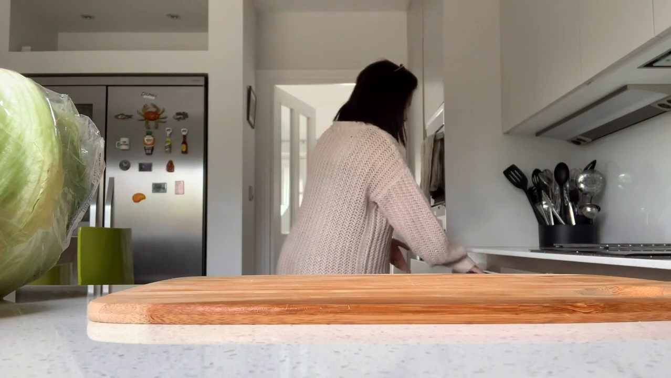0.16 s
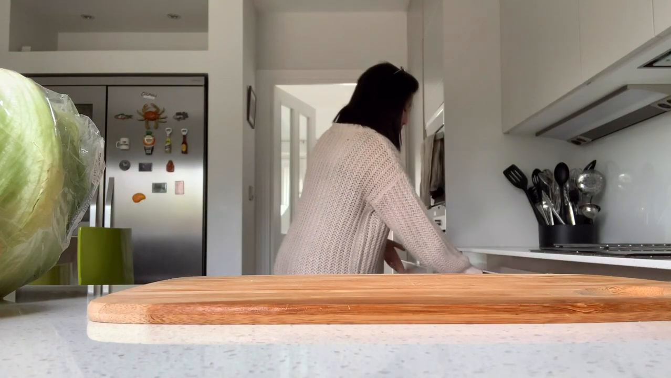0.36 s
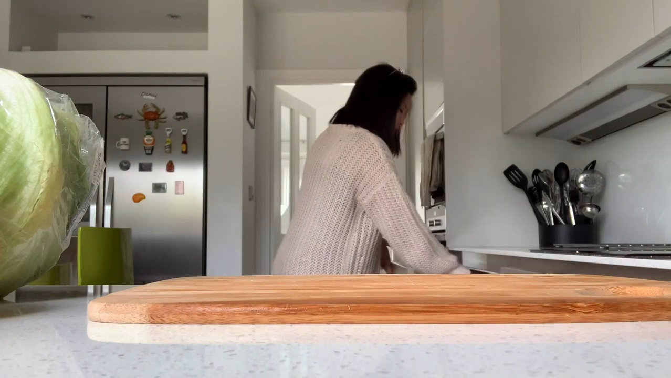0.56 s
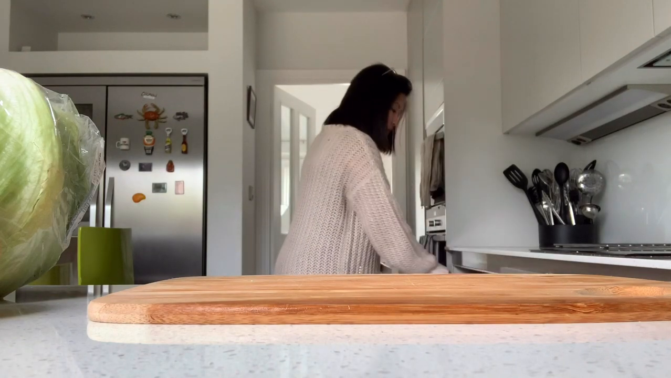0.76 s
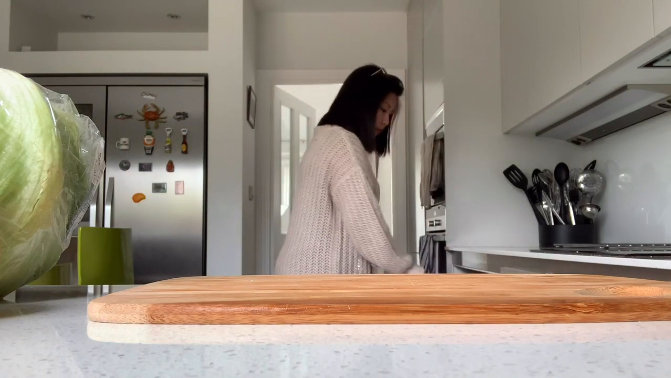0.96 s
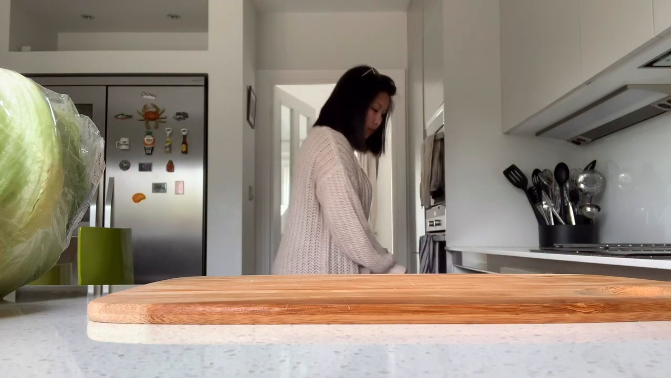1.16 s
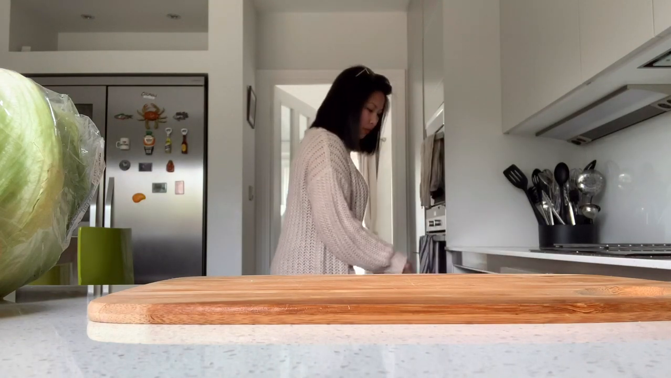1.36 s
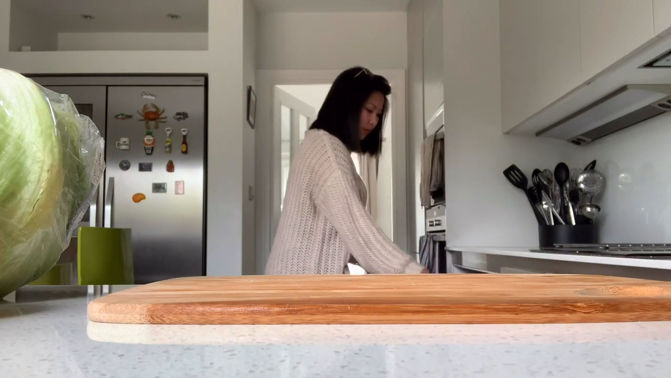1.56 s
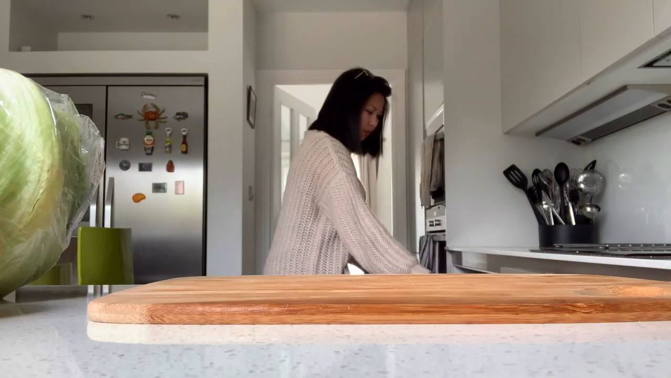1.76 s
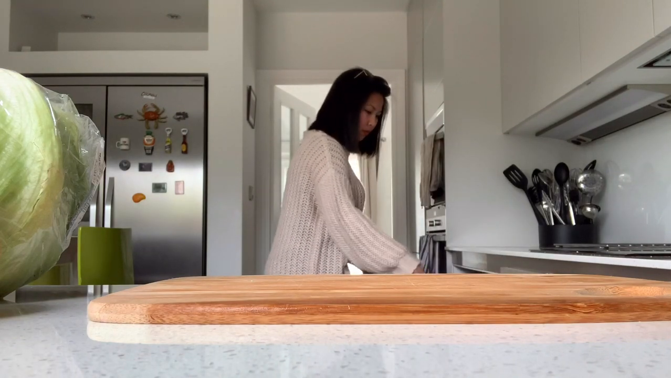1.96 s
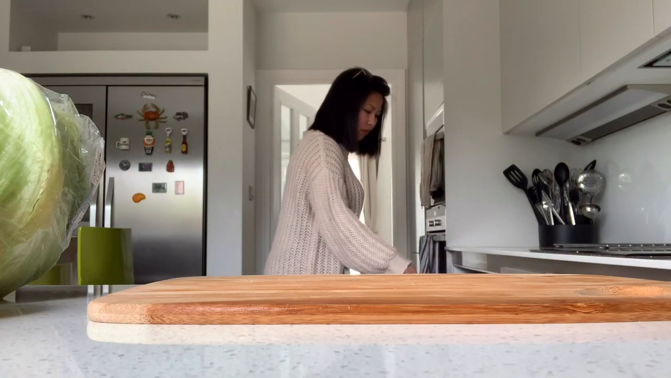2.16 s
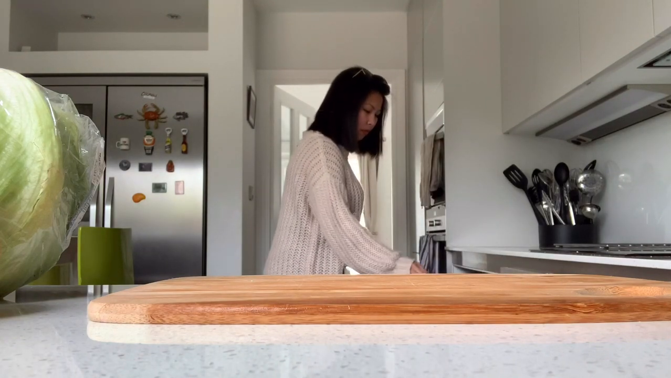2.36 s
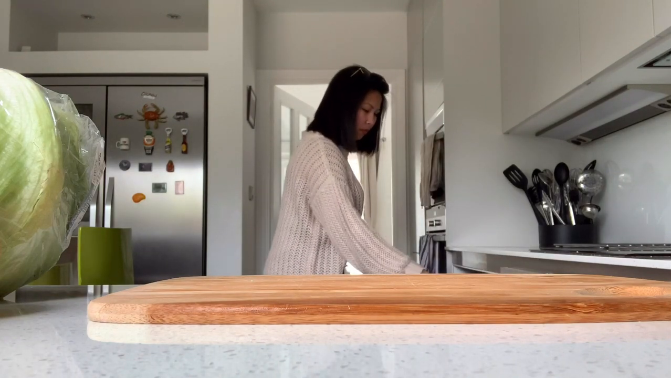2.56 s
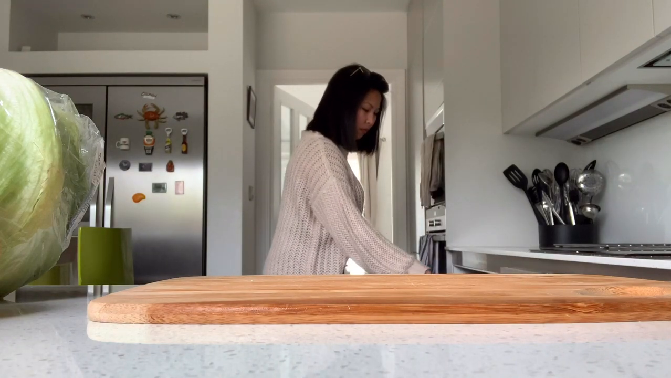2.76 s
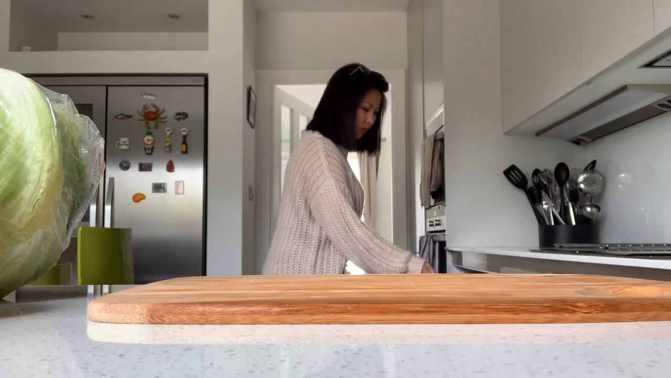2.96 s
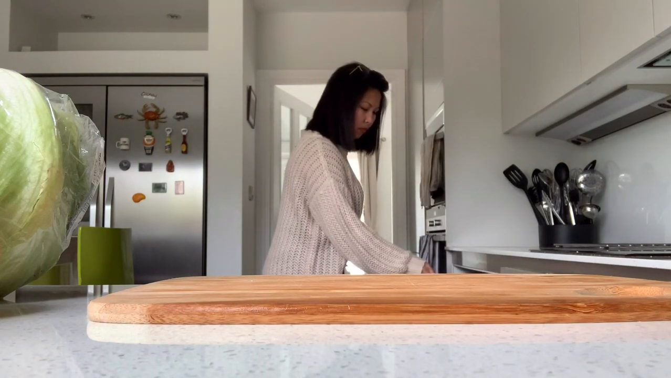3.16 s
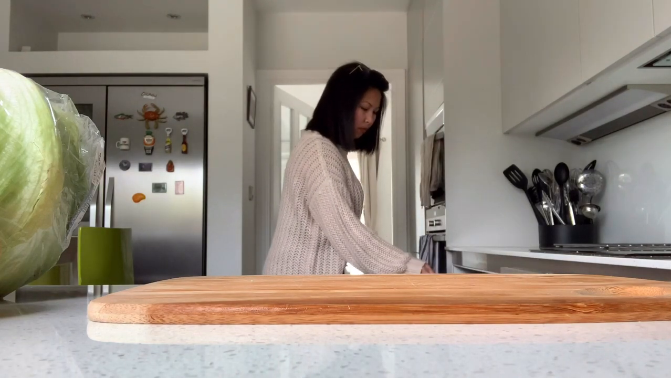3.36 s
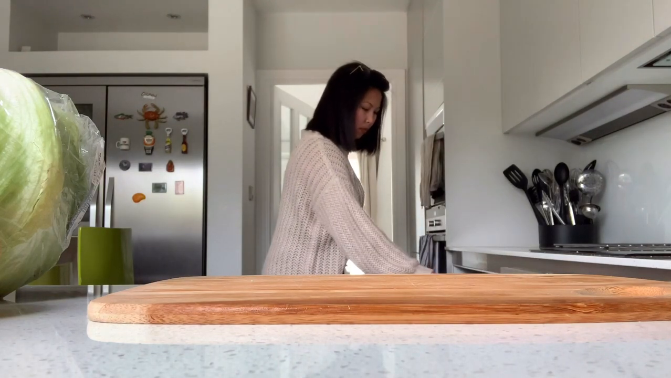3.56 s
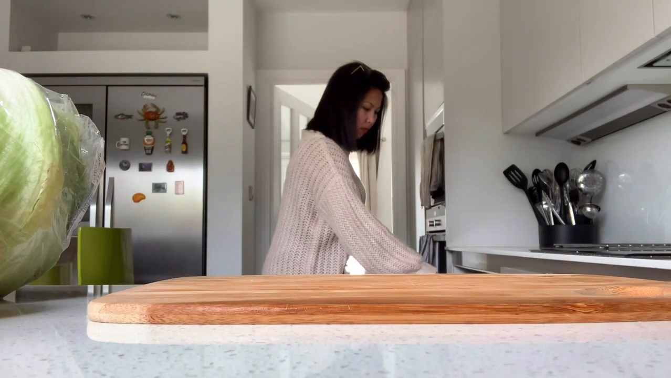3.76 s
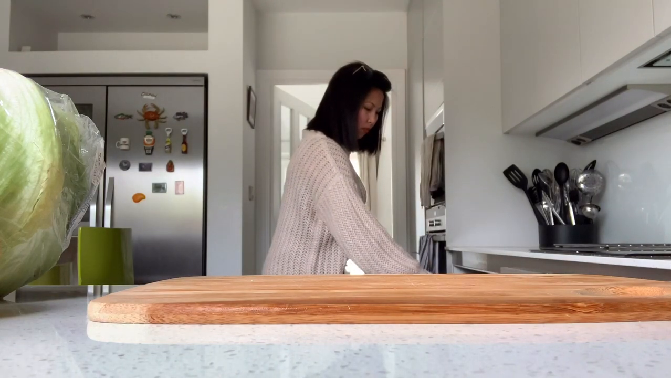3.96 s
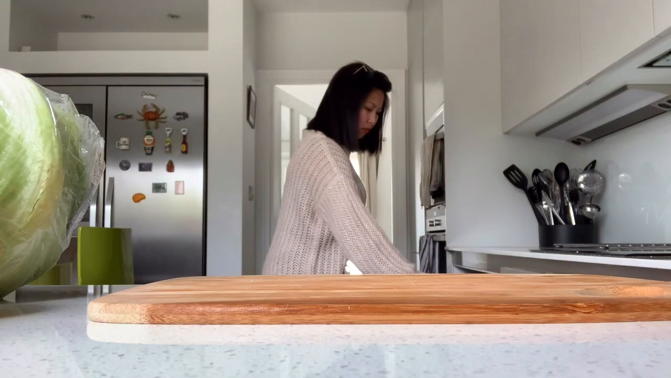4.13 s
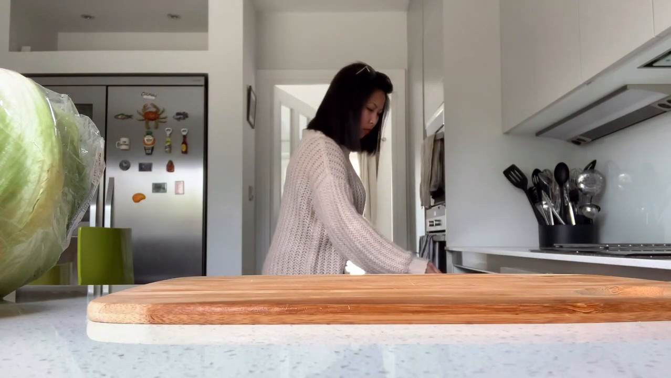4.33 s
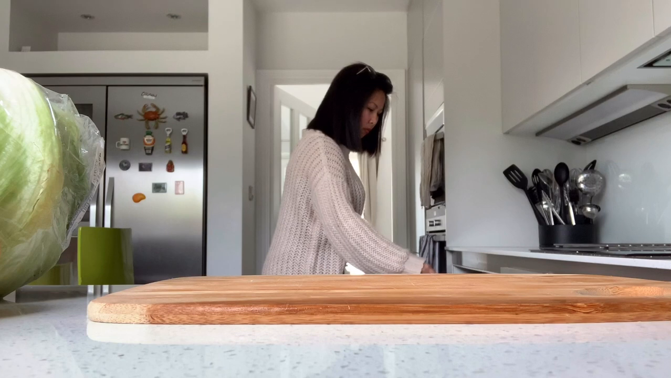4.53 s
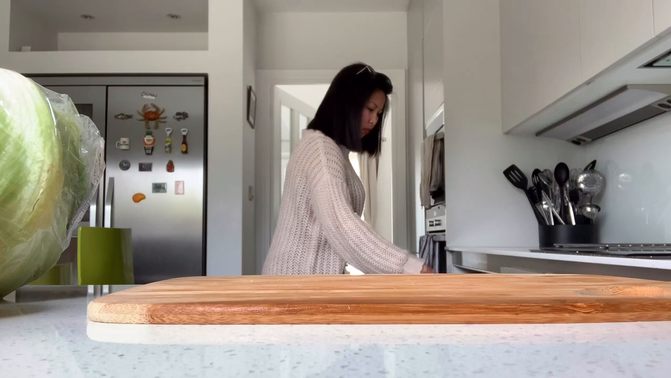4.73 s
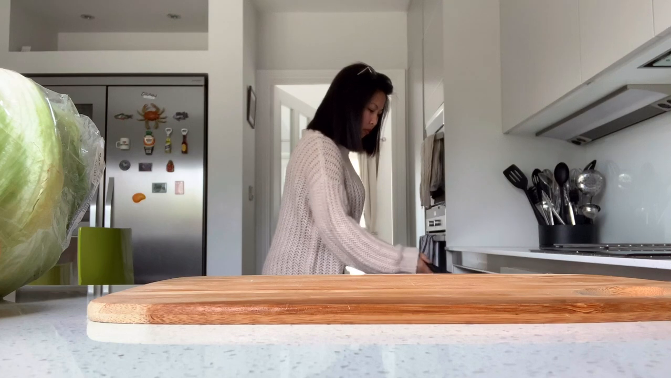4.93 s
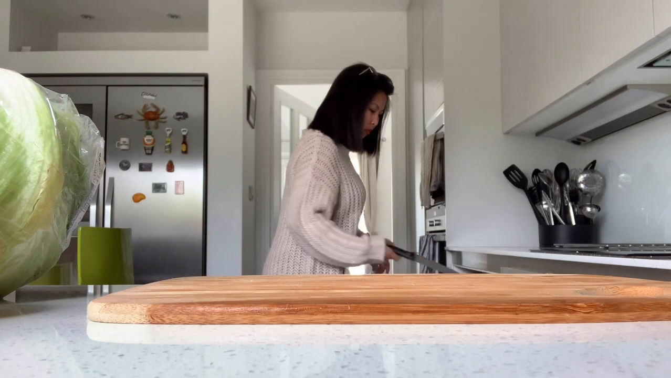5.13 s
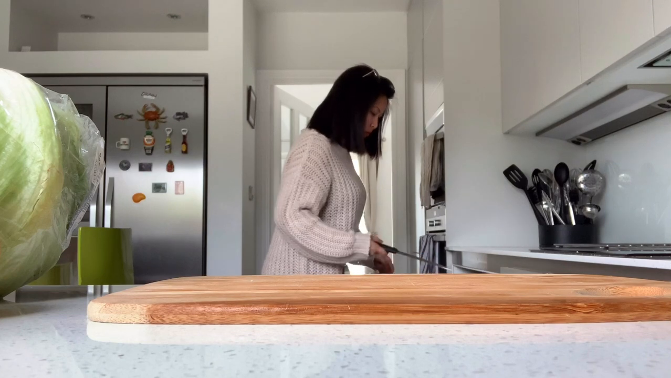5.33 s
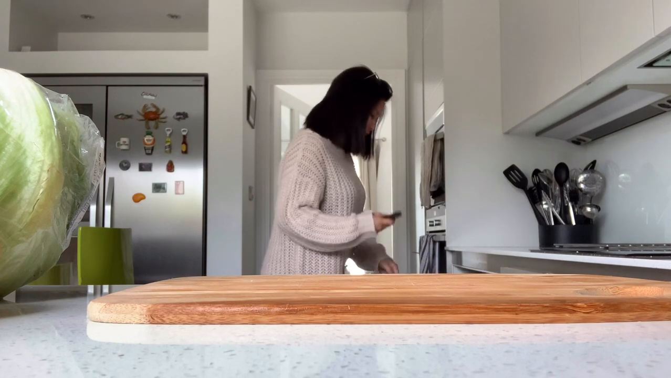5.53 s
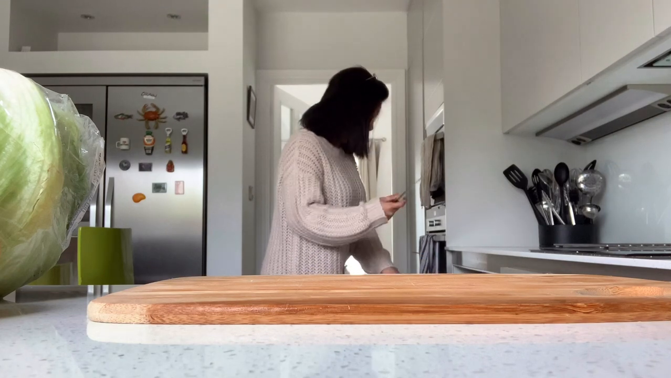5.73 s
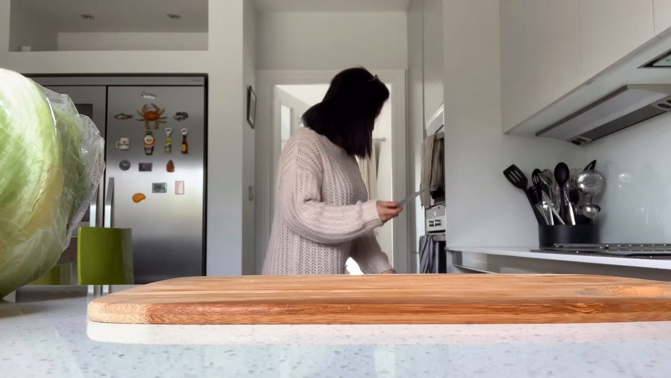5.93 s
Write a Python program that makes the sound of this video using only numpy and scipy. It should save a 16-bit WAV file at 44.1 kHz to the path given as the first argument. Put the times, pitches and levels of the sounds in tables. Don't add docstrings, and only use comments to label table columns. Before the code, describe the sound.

A hand rummages in a wooden kitchen drawer, soft rolling and dull knocks building to sharp steel utensil clatters in a ringing room.

```python
import sys
import numpy as np
from scipy import signal
from scipy.fft import rfft, irfft, next_fast_len
from scipy.io import wavfile
from scipy.ndimage import uniform_filter1d

SR = 44100
rng = np.random.default_rng(int(sys.argv[2]) if len(sys.argv) > 2 else 0)


def volts_from_decibels(level):
    exponent = np.asarray(level, float) / 20
    return 10 ** exponent


def to_wav(s):
    ch = np.atleast_2d(s).T
    pcm = np.round(np.clip(ch, -1, 1) * 32767)
    wavfile.write(sys.argv[1], SR, pcm.astype(np.int16))


N = 268480

# (frequency [Hz], level [dB], t60 [s])
BOX_MODES = [(222.2, 7.5, 0.048), (325.3, -4.5, 0.42), (433.5, -1.5, 0.19), (513.5, 4.5, 0.037),
             (728.5, 2, 0.072), (782, -15, 0.073), (936, -5, 0.053), (1069, -1, 0.0057), (1249, -1, .06)]


def evened(x):
    return x / np.sqrt(np.mean(x ** 2) + 1e-20)


def unit(x):
    return x / np.linalg.norm(x)


def read(points, hz):
    f, value = np.transpose(points)
    return np.interp(np.log(hz + 1), np.log(f + 1), value)


def curves(rows):
    s, *columns = np.transpose(rows)
    return [np.interp(np.arange(N) / SR, s, c) for c in columns]


def swells(start, hold, top_db, rise, fall):
    t = np.arange(0, N, 64)[:, None] / SR
    before, after = np.maximum(start - t, 0), np.maximum(t - start - hold, 0)
    level = (top_db - rise * before - fall * after).max(axis=1)
    return np.interp(np.arange(N) / SR, t[:, 0], level)


def band(x, lo_hz, hi_hz, order=2):
    return signal.sosfilt(signal.butter(order, [lo_hz, hi_hz], "bandpass", fs=SR, output="sos"), x)


def resonate(x, hz, width):
    r = np.exp(-np.pi * width / SR)
    return signal.lfilter([1 - r, 0, r - 1], [1, -2 * r * np.cos(2 * np.pi * hz / SR), r * r], x)


def grit(per_s, spread_db):
    size = volts_from_decibels(spread_db * np.minimum(rng.exponential(1, N), 4))
    present = rng.random(N) < per_s / SR
    return evened(size * present * rng.choice([-1., 1.], N))


def ring(hz, db, t60, phase, t):
    poles = 2j * np.pi * hz - np.log(1000) / t60
    weights = volts_from_decibels(db) * np.exp(2j * np.pi * phase)
    return unit((weights @ np.exp(np.outer(poles, t).astype(np.complex64))).imag)


def fridge():
    # (start [s], hold [s], level [dB])
    hum = [(-.05, 0.047, -49.5), (0.423, 0.033, -56.5), (0.69, 0.067, -64), (1.123, 0.025, -63),
           (1.32, 0.063, -53.5), (2.367, 0.038, -64.5), (2.74, 0.37, -64), (3.147, 0.15, -54),
           (3.417, .1, -49), (3.85, .01, -81), (4.3, 0.57, -54.5), (5.234, .01, -55.5), (5.5, .53, -55.5)]
    hum_hz, width_hz = 56, 3
    rise_db_per_s, fall_db_per_s = 157.5, 131
    drift = uniform_filter1d(rng.standard_normal(N), size=5000)
    waver = evened(uniform_filter1d(drift, size=5000))
    turns = np.cumsum(hum_hz + .3 * width_hz * waver) / SR
    level_db = swells(*np.transpose(hum), rise_db_per_s, fall_db_per_s) + 10.5
    return volts_from_decibels(level_db) * np.sin(2 * np.pi * turns)


def roll():
    # (time [s], level [dB])
    rumble = [
        (0.0, -54.5),
        (0.5, -51.5),
        (0.72, -45.5),
        (1.41, -49),
        (1.54, -58.5),
        (3.2, -65),
        (3.7, -95.5),
        (5.3, -72),
        (6.09, -70),
    ]
    # (time [s], cabinet level [dB], panel level [dB])
    jolts = [(0.07, -44.5, -60), (0.3, -46, -58), (0.61, -33, -43), (0.9, -40.5, -50), (1.1, -44, -47),
             (1.33, -39.5, -58), (1.71, -49, -43), (1.82, -52.5, -57), (1.93, -50.5, -49), (2.07, -50, -60),
             (2.72, -49, -58), (2.95, -48, -54.5), (2.19, -69, -52.5), (2.368, -38.5, -52),
             (2.56, -57, -65), (2.85, -49, -61.5), (3.05, -46.5, -57), (3.2, -45, -41), (3.36, -36, -43.5),
             (3.55, -45.5, -64), (3.86, -57, -54), (4.09, -47, -49), (4.29, -41, -58.5), (4.39, -55, -48),
             (4.559, -52.5, -54), (4.81, -44.5, -52), (5.1, -42, -43), (5.3, -60.5, -65), (5.7, -59, -63)]
    # (frequency [Hz], width [Hz], level [dB])
    panel_modes = [(163.5, 46, -0.5), (238.2, 7.6, -4.5), (303, 25, -1.5), (330.7, 1.8, -13.5),
                   (420, 24, -14.5)]
    # (frequency [Hz], width [Hz])
    cabinet_mode = (74, 17)
    hold_s, rise_db_per_s, fall_db_per_s, cabinet_rest_db = 0.013, 218.5, 156, -65

    s, *jolt_db = np.transpose(jolts)
    cabinet_db, panel_db = (swells(s, hold_s, db, rise_db_per_s, fall_db_per_s) for db in jolt_db)
    cabinet_db = np.maximum(cabinet_db, cabinet_rest_db)
    panel_db = np.maximum(panel_db, curves(rumble)[0])
    bumps = grit(320, 3.1)
    cabinet = resonate(resonate(grit(430, 2.2), *cabinet_mode), cabinet_mode[0], 90)
    panels = 0
    for hz, width, db in panel_modes:
        panels = panels + volts_from_decibels(db) * evened(resonate(resonate(bumps, hz, width), hz, 4 * width))
    return volts_from_decibels(cabinet_db - 2.0) * evened(cabinet) + volts_from_decibels(panel_db - 1.0) * evened(panels)


def slide():
    # (time [s], rub level [dB])
    pressure = [(0.0, -69), (0.73, -59), (1.2, -67), (1.86, -67), (1.95, -49.5), (2.14, -59), (2.42, -43.5),
                (2.73, -55.5), (3.24, -52), (3.38, -30), (3.92, -76), (4.33, -36), (4.58, -61.5),
                (4.98, -68), (5.1, -42), (5.4, -97), (5.75, -80), (5.97, -75.5)]
    loudest_rub_db = -44
    rasp_db, hiss_db = -13.5, -32
    rub_db, = curves(pressure)
    slips = grit(690, 4.5)
    rub = 0.74 * band(slips, 500, 1000)
    for hz, db, _ in BOX_MODES[2:]:
        rub = rub + volts_from_decibels(db) * resonate(slips, hz, 99)
    rasp = band(slips, 1086, 2730)
    hiss = band(grit(2500, 2.8), 3000, 12000)
    mix = evened(rub) + volts_from_decibels(rasp_db) * evened(rasp) + volts_from_decibels(hiss_db) * evened(hiss)
    return volts_from_decibels(np.minimum(rub_db, loudest_rub_db) + 2.0) * mix


def air():
    # (frequency [Hz], density [dB per Hz])
    spectrum = [(59, -40.5), (100, -22), (149, -22), (300, -19.5), (333, -2), (378, -24.5), (576, -45.5),
                (1340, -38.5), (8770, -52.5), (12600, -41.5), (15500, -50.5)]
    size = next_fast_len(N)
    noise = rfft(rng.standard_normal((2, size)))
    shaped = irfft(noise * volts_from_decibels(read(spectrum, np.fft.rfftfreq(size, 1 / SR))), size)[:, :N]
    return volts_from_decibels(-69.5) * evened(shaped)


def blows():
    # (time [s], thud level [dB], thud pitch [Hz], clack above thud [dB], clink above thud [dB])
    thuds = [(0.004, -47.5, 338, -6, -6.5), (0.1, -52.5, 332, 2, -10.5), (0.391, -44.5, 280, -3, -11),
             (0.536, -43, 300, -1.5, 1), (0.599, -38.5, 243, -7, -17), (0.733, -48, 324, -31.5, -9),
             (1.34, -44.5, 690, -10, -11), (1.379, -56, 337, -11, 11.5), (1.411, -48, 239, 3.5, 4),
             (1.595, -38, 915, -30, -17.5), (1.615, -35, 374, -24.5, -23), (1.655, -37.5, 950, -3, -21.5),
             (2.267, -34.5, 372, -24, -17), (2.283, -38, 1210, -2.5, -26.5), (2.3, -26, 330, -25.5, -19),
             (2.79, -27, 400, -11, -27.5), (2.888, -28.5, 667, -13, -18), (2.916, -21, 1004, -9.5, -15),
             (3.143, -24.5, 704, -42.5, -39), (3.809, -44, 743, -6, -40.5), (4.274, -23, 468, -2.5, -6.5),
             (4.788, -29.5, 334, -12, -14.5), (4.058, -36.5, 540, -26, -15.5)]
    # (time [s], thud level [dB], thud pitch [Hz],
    # clack above thud [dB], clink above thud [dB])
    clinks = [(1.667, -28.5, 1038, -7, -16), (1.92, -31, 1280, 1, -17), (1.933, -26, 350, -10.5, -17),
              (2.333, -15, 889, -4.5, -11.5), (2.341, -19, 871, -35, -4.5), (2.359, -17.5, 1000, -6.5, -24),
              (2.732, -29.5, 724, -9, -15.5), (3.159, -38.5, 875, -26, -47.5),
              (3.866, -50, 315, -13, -17.5), (3.225, -32, 746, -6, -9.5), (3.285, -18.5, 886, -13, -17),
              (3.3, -12.5, 530, -12, -18.5), (3.355, -17, 725, -4, -13.5), (3.39, -13.5, 420, -35.5, -8.5),
              (4.025, -37, 740, -1.5, -10.5), (4.097, -32.5, 950, -12, -10), (4.247, -24, 750, -34, -2),
              (4.254, -16, 697, -8, -17), (4.309, -23.5, 890, -5.5, -9.5), (4.484, -43.5, 700, -23.5, 3.5),
              (4.761, -29.5, 660, -6, -21), (5.047, -35, 1310, -10, 2.5), (5.055, -25, 903, -2.5, -5.5),
              (5.09, -27.5, 740, -32.5, -8.5)]
    # (start [s], first thud level [dB], loss per bounce [dB],
    # pitch [Hz], clink above thud [dB])
    rattles = [
        (1.689, -36, -1, 660, -22),
        (1.808, -38.5, -0.9, 327, -16),
        (1.959, -33, 2.5, 414, -12),
        (3.19, -35, 7, 700, -40),
        (2.099, -39.5, 3, 790, -29),
        (2.384, -16.5, 7, 380, -9),
        (2.949, -30.5, 3.5, 960, -11.5),
        (3.41, -17.5, 3, 550, -10.5),
        (4.123, -31, 4.9, 356, -13),
    ]
    thud_tick_db, clink_tick_db, rattle_tick_db, rattle_clack_db = -13, -1, -5.5, 4
    bounce_s, bounce_spread_db, bounce_octaves = .029, 4.5, 0.37

    rows = [(*row, row[-1] + thud_tick_db) for row in thuds]
    rows += [(*row, row[-1] + clink_tick_db) for row in clinks]
    for s, db, loss_db, hz, clink_db in rattles:
        for k, (late, size, spot) in enumerate(rng.uniform(-1, 1, size=(4, 3))):
            at_s = s + bounce_s * k * (1 + 0.051 * late)
            thud_db = db - loss_db * k + bounce_spread_db * size
            pitch_hz = hz * 2 ** (bounce_octaves * spot)
            rows.append((at_s, thud_db, pitch_hz,
                         clink_db + rattle_clack_db, clink_db, clink_db + rattle_tick_db))
    return rows


def knocks():
    # (from [Hz], to [Hz], t60 [s], one blade mode [Hz])
    steel = [(1511.5, 2550, 0.043, 940), (2960, 7300, 0.047, 16000), (8060, 20000, 0.024, 23000)]
    dull_db = -24
    lead_s = .002

    t = np.arange(3300) / SR
    paths = np.zeros((4, N + 4000))
    box_hz, box_db, box_t60 = np.transpose(BOX_MODES)
    soft = 1 - np.exp(-t / .0015)
    fade = np.cos(np.pi / 2 * t / t[-1])
    for k, (s, db, hz, *steel_db) in enumerate(blows()):
        u, noise = rng.random((8, 10)), rng.standard_normal((2, len(t)))
        contacts = np.exp(0.55 * evened(uniform_filter1d(noise[1], size=60)))
        crack = unit(noise[0] * contacts * soft * volts_from_decibels(-60 * t / .035))
        near_db = -5 * abs(np.log2(box_hz / hz)) + 8 * u[0, :len(BOX_MODES)]
        body = ring(np.append(box_hz, hz), np.append(box_db + near_db, 3), np.append(box_t60, .05), u[1], t)
        sound = soft * fade * body + .75 * unit(band(crack, 250, 1350, order=3))
        for row, (lo, hi, t60, blade), rel_db, lift_db in zip((2, 3, 4), steel, steel_db, (.1, .1, 6)):
            mode_hz = np.append(blade, lo + (hi - lo) * u[row, 1:])
            mode_db = np.append(14 * u[5, 0], 9 * u[5, 1:])
            modes = ring(mode_hz, mode_db, t60 * (.5 + 2 * u[6]), u[7], t)
            burst = unit(band(crack, lo, hi, order=3))
            sound += volts_from_decibels(rel_db + lift_db) * (burst + 0.74 * soft * modes)
        at = max(round((s - lead_s) * SR), 0)
        paths[k % 3, at:at + len(t)] += volts_from_decibels(db + 20.5) * sound
        padded = np.clip((dull_db - steel_db[0]) / 20, 0, 1)
        paths[-1, at:at + len(t)] += volts_from_decibels(db + 18.5) * padded * sound
    return paths[:, :N]


def scuff():
    # (start [s], hold [s], level [dB])
    strokes = [
        (0.02, 0.11, -60.5),
        (0.56, 0.034, -59.5),
        (1.41, 0.046, -56.5),
        (1.68, 0.04, -56.5),
        (4.78, 0.02, -67),
        (3.82, 0.026, -78.5),
        (5.678, .03, -82),
    ]
    rise_db_per_s, fall_db_per_s = 392, 159.5
    level_db = swells(*np.transpose(strokes), rise_db_per_s, fall_db_per_s)
    return volts_from_decibels(level_db) * evened(band(grit(6000, 2.2), 2100, 4700, order=1))


def room(x, direct_db, length=1):
    # (frequency [Hz], t60 [s])
    decay = [(100, 0.92), (260, 0.07), (700, 0.67), (1840, 0.59), (4850, 0.7), (8000, 0.48), (12800, 0.32)]
    # (frequency [Hz], time [s])
    build = [(200, .008), (1500, .004), (14000, .004)]
    early_db, early_s = 6, .02

    taps = np.zeros((2, 33000))
    at = np.arange(60, 33000, 12) + rng.integers(0, 12, (2, (33000 - 60) // 12))
    np.put_along_axis(taps, at, rng.choice([-1., 1.], at.shape), 1)
    hz, t, z = signal.stft(taps, SR, nperseg=128, noverlap=96)
    shape = volts_from_decibels(-60 * t / length / read(decay, hz)[:, None])
    shape *= 1 - np.exp(-t / abs(read(build, hz))[:, None])
    shape *= 1 + volts_from_decibels(early_db) * np.exp(-t / early_s)
    z = z * shape
    z = z / np.linalg.norm(z, axis=2, keepdims=True)
    tail = signal.istft(z, SR, nperseg=128, noverlap=96)[1]
    tail[:, :60] = 0
    tail /= np.linalg.norm(tail[0])
    tail[:, 0] = volts_from_decibels(direct_db)
    return signal.fftconvolve(x[None], tail, axes=1)[:, :N]


def scene():
    *paths, inside = knocks() + (slide() + scuff()) * [[1], [0], [0], [0]]
    struck = sum(room(path, direct_db=-13.5) for path in paths)
    cabinet = room(inside, direct_db=-17.5, length=.1)
    rolling = 0.65 * room(roll(), direct_db=-0.5)
    return struck + cabinet + rolling + fridge() * [[1], [0]] + air()


def gate(x):
    # (frequency [Hz], level [dB per bin])
    threshold = [(400, -125), (1500, -108), (4000, -76), (9000, -89)]
    hz, _, z = signal.stft(x, SR, nperseg=512)
    power = uniform_filter1d((abs(z) ** 2).mean(axis=0), size=9, axis=0)
    power = uniform_filter1d(power, size=5, axis=1)
    under_db = np.minimum(10 * np.log10(abs(power) + 1e-20) - read(threshold, hz)[:, None], 0)
    return signal.istft(z * volts_from_decibels(0.15 * under_db), SR, nperseg=512)[1][:, :N]


def roll_off(x):
    return signal.sosfilt(signal.butter(12, 15750, fs=SR, output="sos"), x)


def record(dry):
    # (frequency [Hz], coherence [0 to 1])
    likeness = [(60, .95), (170, .85), (300, .7), (640, .02), (5000, .1), (6800, .5), (7900, .985),
                (13500, .985), (15000, .9)]
    # (frequency [Hz], phase [turns])
    lead = [(4900, 0), (6000, .16), (7300, .42), (7900, .5), (9100, .5), (9600, .6), (11000, .87),
            (11500, 1), (13700, 1), (14100, 1.22), (15200, 1.5)]
    # (frequency [Hz], level [dB])
    tilt = [(60, -5), (240, -1.5), (950, 1), (3770, -3), (15000, 4.5)]
    # (frequency [Hz], gain [dB])
    response = [(30, -15), (60, -6), (1000, 6), (3000, 3), (7000, 1.5), (11000, 0), (14000, -11.5),
                (15400, -4)]

    size = next_fast_len(N + 2000)
    hz, (a, b) = np.fft.rfftfreq(size, 1 / SR), rfft(dry, size)
    same = np.clip(read(likeness, hz), 0, 1)
    right = same * np.exp(2j * np.pi * read(lead, hz)) * a + np.sqrt(1 - same ** 2) * b
    balance = volts_from_decibels(read(tilt, hz) / 2)
    ports = np.array([a * balance, right / balance]) * volts_from_decibels(read(response, hz))
    ports *= hz < 15700
    hiss = volts_from_decibels(-96) * band(rng.standard_normal(N), 2500, 14500)
    return roll_off(gate(irfft(ports, size)[:, :N]) + hiss)


dry = scene()
out = record(dry)
to_wav(out)
```